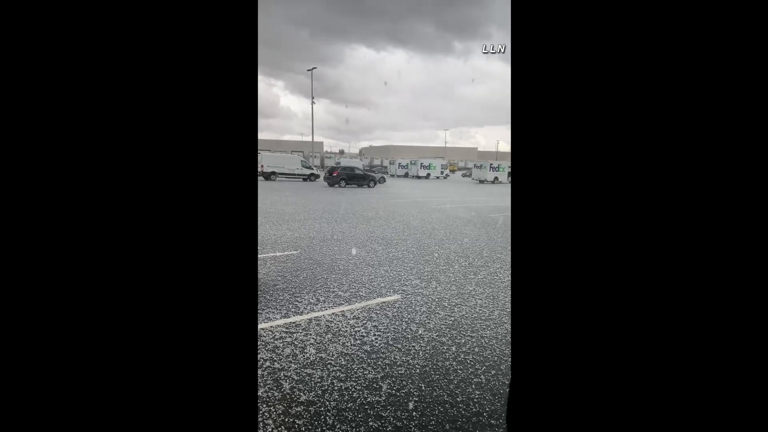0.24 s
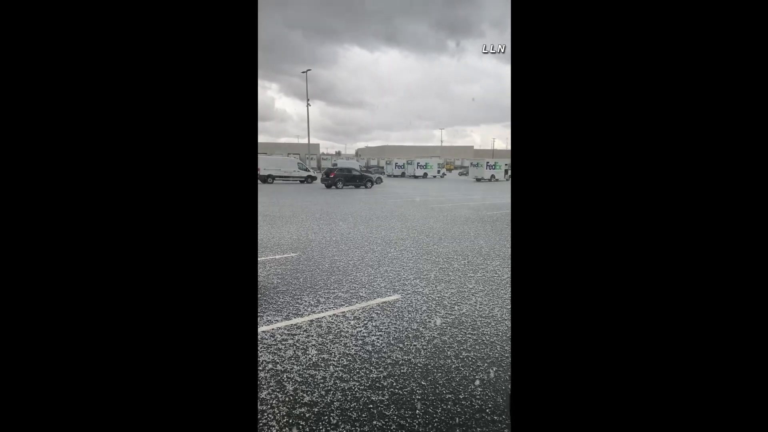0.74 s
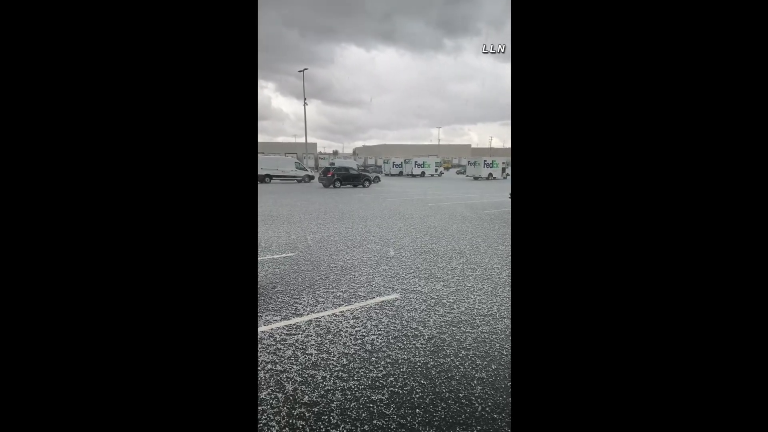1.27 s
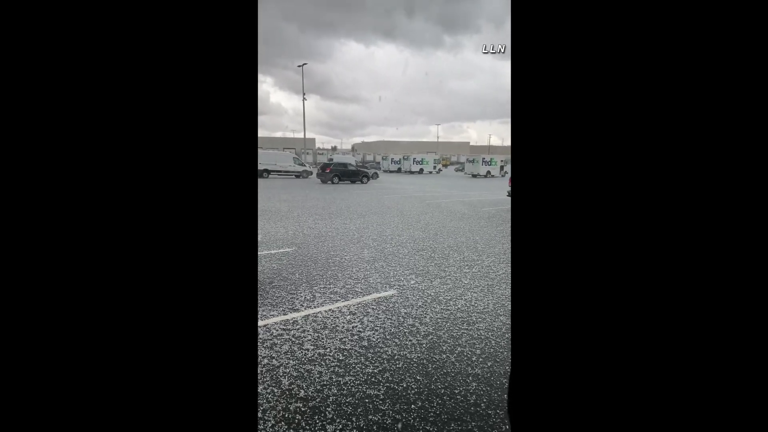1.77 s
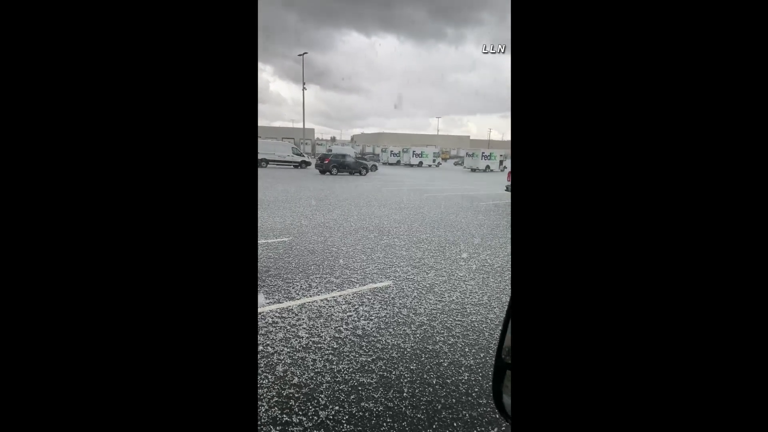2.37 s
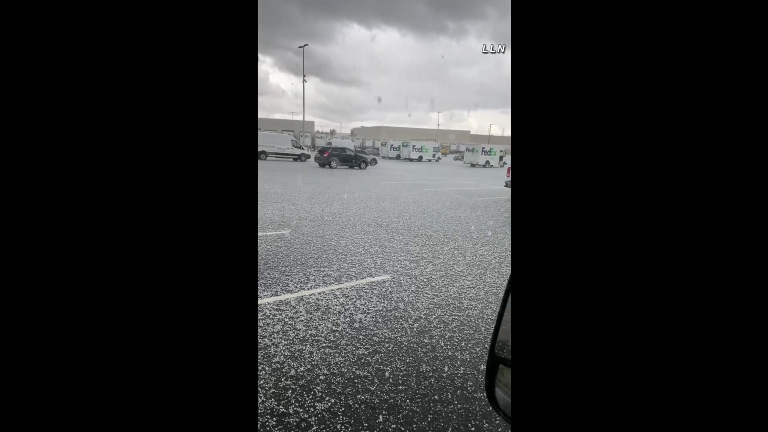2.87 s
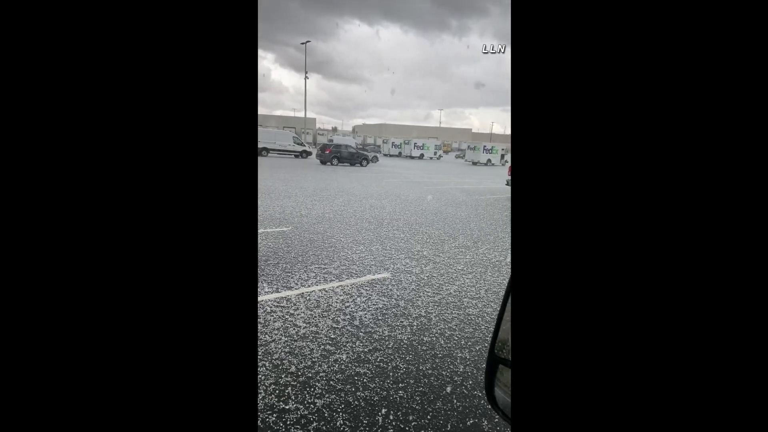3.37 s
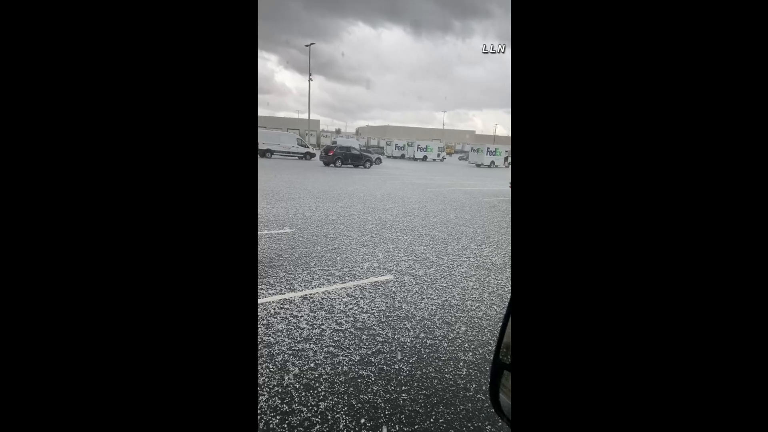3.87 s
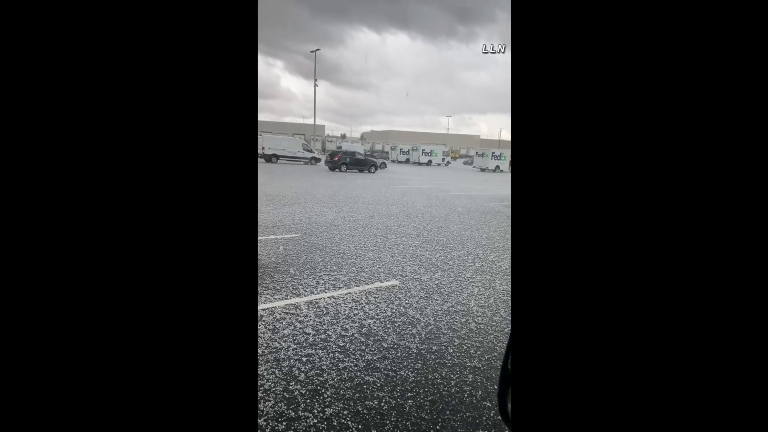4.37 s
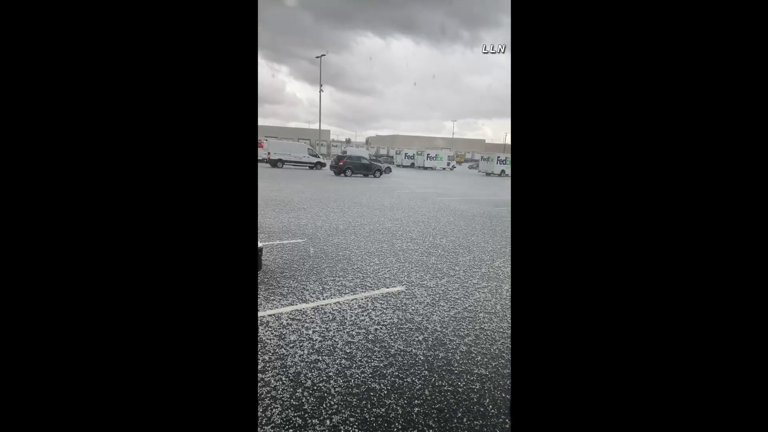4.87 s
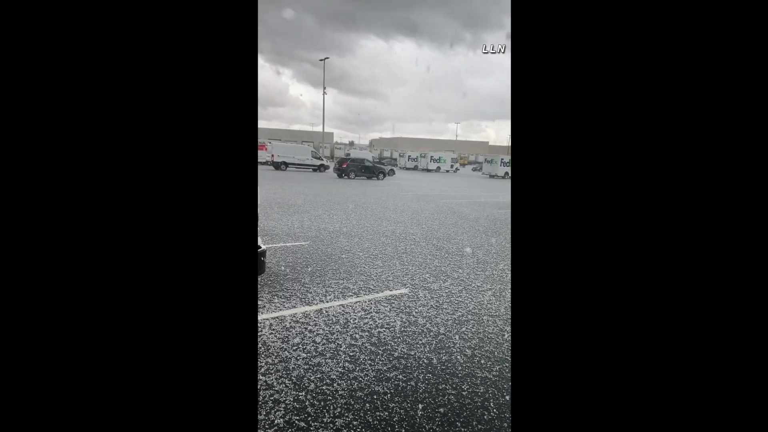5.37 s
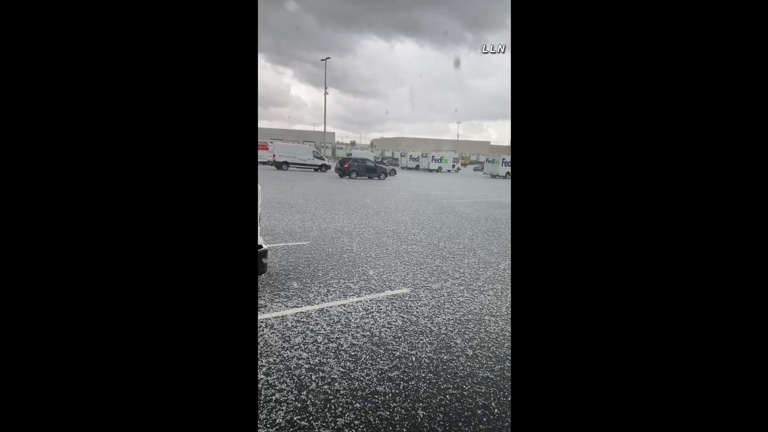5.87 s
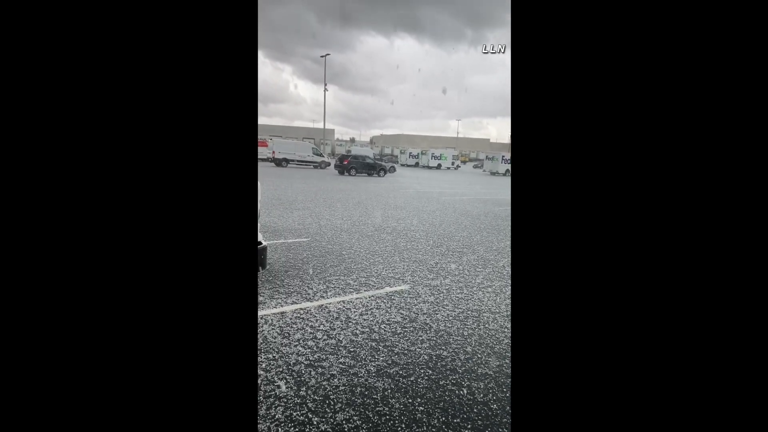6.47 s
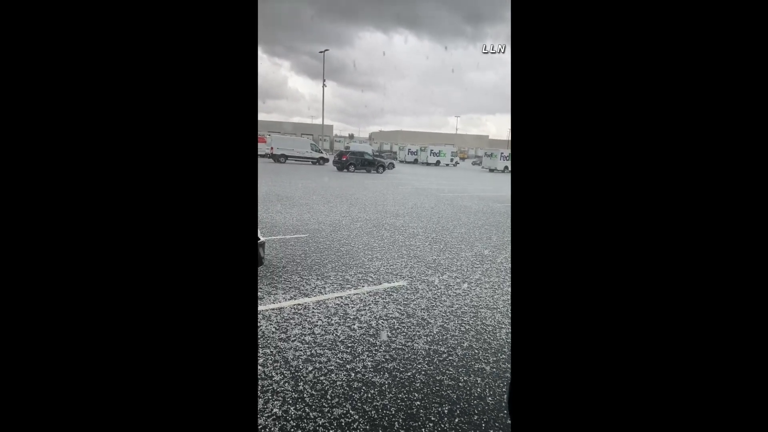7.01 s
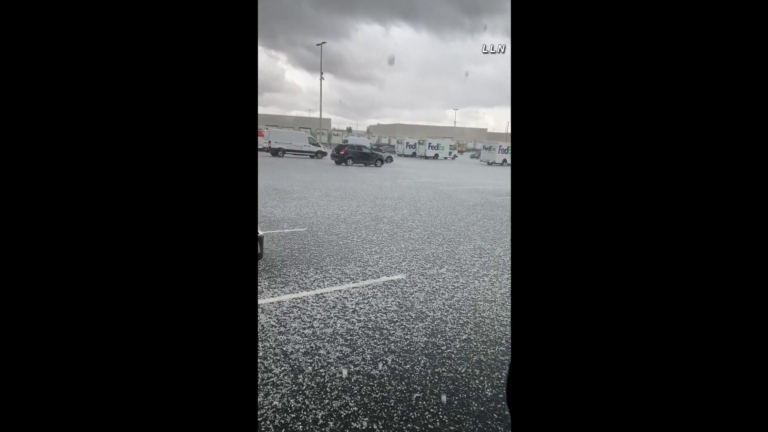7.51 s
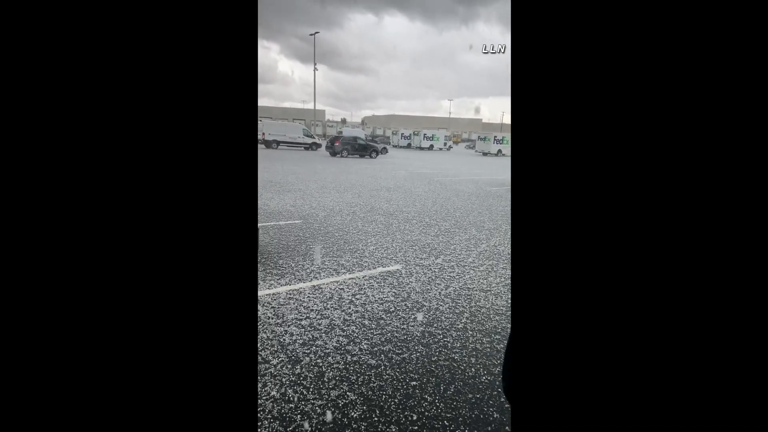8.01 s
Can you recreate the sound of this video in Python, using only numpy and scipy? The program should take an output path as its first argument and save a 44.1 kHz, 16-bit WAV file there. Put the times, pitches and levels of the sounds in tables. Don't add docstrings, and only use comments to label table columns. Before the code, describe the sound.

A steady, crackling clatter of hailstones on pavement and car metal, low cabin booms underneath, heaviest around five to six seconds, then slightly easing.

```python
import sys
import numpy as np
from scipy import signal
from scipy.fft import rfft, irfft, next_fast_len
from scipy.io import wavfile
from scipy.ndimage import uniform_filter1d, map_coordinates

SR = 44100
rng = np.random.default_rng(int(sys.argv[2]) if len(sys.argv) > 2 else 0)


def waveform_to_disk(signal):
    frames = np.transpose(np.atleast_2d(signal))
    scaled = np.clip(frames, -1, 1) * 32767
    samples = np.round(scaled).astype(np.int16)
    wavfile.write(sys.argv[1], SR, samples)


def gain_from_decibels(decibels):
    exponent = np.asarray(decibels, float) / 20
    return 10 ** exponent


N = 363825

# (time [s], level [dB])
FALL = [(0, -31), (.45, -29), (1.1, -28.5), (1.6, -28), (2.0, -27.5), (2.5, -26.5), (2.85, -28),
        (3.5, -24.5), (3.95, -27.5), (4.3, -27), (4.7, -26), (5.0, -25), (5.5, -24.5), (6.2, -24.5),
        (6.8, -24.5), (7.1, -25), (7.7, -27.5), (8.25, -27)]
# (time [s], level over the steady fall [dB], length [s])
GUSTS = [(0.073, 6, 0.028), (0.2, 5, 0.079), (0.81, 1.5, 0.023), (1, 4, 0.024), (1.067, -5, 0.026),
         (1.195, 3.5, 0.079), (1.337, -2, 0.018), (1.607, 3, 0.19), (1.7, -7, 0.013), (1.79, 5, 0.056),
         (1.933, -3, 0.095), (2.507, 2.5, 0.034), (2.706, 4, 0.029), (2.787, -1, 0.032),
         (2.954, 3.5, 0.062), (2.993, -6, 0.03), (3.028, 6.5, 0.045), (3.683, 2.5, 0.018),
         (4.033, 5, 0.015), (4.26, 2, 0.034), (4.368, -6.5, 0.022), (4.383, 3.5, 0.034),
         (4.983, 6.5, 0.022), (5.15, -5.5, 0.014), (5.187, 2.5, 0.013), (5.474, -4, 0.013),
         (5.495, 5, 0.017), (5.673, -2, 0.013), (7.424, -1.5, 0.063), (8.01, 5, 0.024)]
# (time [s], level over the steady fall [dB], length [s])
SHEETS = [(0.057, 1.5, 0.034), (0.167, 1.5, 0.017), (0.229, -1.5, 0.023), (0.476, -1.5, 0.022),
          (0.783, 0.5, 0.025), (0.883, -0.7, 0.05), (1.005, 3, 0.025), (1.048, -3.5, 0.019),
          (1.085, -0.5, 0.023), (1.125, -0.3, 0.021), (1.372, -1.5, 0.027), (1.559, 1.8, 0.025),
          (1.616, 1, 0.05), (1.771, -1.5, 0.16), (1.995, 0.7, 0.041), (2.038, 1, 0.025), (2.39, 2, 0.025),
          (2.432, -1.8, 0.03), (2.562, 1, 0.023), (2.637, -1, 0.021), (2.694, 1.5, 0.019),
          (2.744, -2.5, 0.017), (2.873, 0.9, 0.055), (3.108, -2, 0.017), (3.208, -1.5, 0.026),
          (3.455, -2, 0.02), (3.597, -1, 0.02), (3.662, 1.5, 0.011), (3.719, -2, 0.028), (3.791, 2, 0.024),
          (3.844, 0.5, 0.035), (3.894, -0.3, 0.025), (3.939, 2, 0.015), (4.018, 1, 0.027),
          (4.088, 3, 0.023), (4.146, -1.5, 0.019), (4.283, -2, 0.049), (4.325, 0, 0.025), (4.36, -4, 0.017),
          (4.395, 1.5, 0.025), (4.467, -0.5, 0.027), (4.535, 0.4, 0.05), (4.804, 2.5, 0.018),
          (5.076, 0.9, 0.12), (5.223, 1, 0.021), (5.348, 0.8, 0.014), (5.772, -0.6, 0.057),
          (5.817, 1.5, 0.033), (6.156, -1.5, 0.017), (6.323, 2, 0.025), (6.388, 1, 0.025),
          (6.622, 2, 0.017), (6.702, 0.4, 0.017), (6.834, 1.9, 0.04), (6.964, 2.5, 0.022),
          (7.236, -3, 0.027), (7.478, 1.7, 0.037), (7.568, 5, 0.016), (7.999, 2.5, 0.028),
          (8.141, -0.4, 0.025)]
# (frequency [Hz], width [Hz], left level [dB], right level [dB])
CABIN = [(52.7, 39, -11, -10.5), (82, 74, -14, -14), (148.7, 72, -5, -5), (270.7, 29, -7, -4),
         (321, 35, -5, -6), (385, 71, -5.5, -3.5), (480, 85, -12.5, -13), (646, 74, -4.5, -0.4),
         (818, 8.6, 3.5, -2), (945, 540, -2, -6), (1230, 42, -20, -6.5), (1390, 100, -5, -5)]
# (time [s], level [dB], ring [Hz])
BOOMS = [(0.132, -30, 137), (0.459, -33, 143), (0.791, -23, 146), (1.004, -28, 181), (1.121, -28, 135),
         (1.274, -28, 178), (1.597, -40, 150), (1.764, -35, 203), (2.255, -22.5, 133), (2.464, -36, 130),
         (2.567, -22, 161), (2.831, -28, 132), (2.922, -26, 54), (3.051, -24.5, 151), (3.926, -23, 144),
         (4.231, -31, 178), (4.369, -29, 168), (4.578, -27, 127), (4.678, -19, 137), (4.892, -21, 153),
         (5.488, -21, 147), (5.701, -27, 144), (5.868, -28, 141), (6.19, -21, 143), (6.303, -24, 162),
         (6.726, -22, 121), (7.061, -19, 136), (7.443, -30, 147), (7.557, -28.5, 130), (7.853, -30, 164)]
# (time [s], peak [dB], ring [Hz])
THUDS = [(0.07, -21, 330), (0.502, -21.5, 614), (0.63, -22, 318), (0.98, -17, 329), (1.197, -25, 387),
         (1.377, -18, 405), (1.55, -21, 318), (1.617, -15, 350), (1.711, -19, 403), (1.77, -17, 410),
         (2.108, -15, 297), (2.351, -14.5, 375), (2.454, -23, 676), (2.565, -21, 370), (2.852, -16, 402),
         (2.941, -14.5, 342), (3.007, -18, 237), (3.247, -17, 350), (3.393, -14, 359), (3.537, -21, 330),
         (3.631, -21, 344), (3.682, -13, 706), (4.0, -20, 660), (4.243, -14, 347), (4.385, -12, 288),
         (4.472, -13, 271), (4.83, -16, 680), (4.9, -16, 603), (4.981, -17.5, 393), (5.065, -8, 400),
         (5.178, -13, 336), (5.244, -18, 323), (5.566, -15, 290), (5.661, -9, 364), (5.809, -20, 293),
         (6.088, -17, 400), (6.121, -15, 600), (6.352, -9, 270), (6.434, -15, 318), (6.5, -15, 253),
         (6.613, -15, 430), (6.753, -19, 316), (6.927, -24, 248), (7.039, -16, 257), (7.14, -16, 395),
         (7.326, -18, 270), (7.566, -19, 340), (7.634, -17, 404), (7.792, -15.5, 395), (8.117, -16, 320)]
# (time [s], peak [dB], ring [Hz])
CRACKS = [(0.1595, -17, 3940), (0.1845, -20.5, 3590), (0.3336, -19.5, 4160), (0.4733, -18, 3800),
          (0.7751, -26.5, 3950), (1.0819, -18, 3730), (1.2595, -26, 4340), (1.278, -15, 3960),
          (1.3114, -15.5, 3890), (1.4875, -19, 3600), (1.5514, -20, 3800), (1.6137, -18, 3570),
          (1.8432, -21, 3750), (1.9011, -20, 4040), (1.928, -20, 3740), (1.9739, -19, 3500),
          (2.0707, -16, 3780), (2.1121, -17, 3860), (2.1635, -18, 3470), (2.1974, -23, 4300),
          (2.2253, -21, 3600), (2.4882, -27, 3900), (2.6873, -17.5, 3880), (3.1916, -17, 4760),
          (3.2076, -20, 4000), (3.3667, -24, 3550), (3.5798, -31, 3760), (3.596, -9.5, 4360),
          (3.7604, -15.5, 3830), (3.933, -21.5, 3460), (4.0203, -16, 3250), (4.0791, -10.5, 4530),
          (4.3141, -26, 3260), (4.3291, -21, 4260), (4.3819, -22, 3800), (4.4343, -25, 3870),
          (4.5411, -20, 4010), (4.7326, -27, 3950), (4.7471, -17, 3740), (4.803, -22, 3320),
          (4.8808, -21, 3700), (4.9048, -16, 3680), (5.0075, -18, 3850), (5.1327, -18, 4590),
          (5.2794, -27, 3730), (5.3193, -20.5, 4130), (5.5004, -20, 3250), (5.9868, -17, 3230),
          (6.0975, -18, 4050), (6.1115, -21, 3360), (6.1943, -25, 4250), (6.3051, -25, 4220),
          (6.4817, -19.5, 3900), (6.7925, -31, 4400), (6.8089, -29, 3560), (6.8728, -15, 3450),
          (7.3228, -27, 3320), (7.3572, -14, 4150), (7.4819, -20, 4300), (8.1703, -18, 4200)]
# (time [s], peak [dB], ring [Hz])
KNOCKS = [(0.4467, -27, 3150), (0.6284, -19.5, 2560), (1.012, -25.5, 2880), (1.5753, -16, 2820),
          (2.0712, -22, 3080), (2.1016, -24, 3070), (2.1963, -23, 2950), (2.2752, -19, 2760),
          (2.5639, -19, 2950), (2.9367, -27, 2490), (3.013, -25, 2860), (3.1908, -16, 2400),
          (3.202, -16, 2930), (3.3662, -28, 3150), (3.692, -18, 2570), (3.761, -16, 2600),
          (3.852, -29, 2740), (3.9382, -22, 2850), (3.9948, -39, 2710), (4.012, -20, 2560),
          (4.0241, -19, 2590), (4.1012, -16, 2960), (4.3282, -21.5, 2460), (4.577, -15.5, 2620),
          (4.7098, -21, 2700), (4.7336, -23, 2400), (4.7512, -17, 2710), (4.804, -26, 2670),
          (4.8626, -22.5, 2950), (4.9376, -25, 3010), (4.977, -30, 2930), (5, -25, 2590),
          (5.0769, -23.5, 2830), (5.2822, -20.5, 2790), (5.3215, -23, 2710), (5.3774, -25, 2830),
          (5.507, -19, 2510), (5.5762, -23, 2640), (5.7465, -25, 3100), (5.8195, -19, 2800),
          (5.875, -22, 2250), (5.9346, -22, 3000), (5.967, -17, 2600), (6.098, -28, 3040),
          (6.1774, -27, 2640), (6.1947, -20, 2650), (6.235, -21, 2610), (6.2756, -33, 3000),
          (6.574, -23, 2450), (6.6197, -22, 2590), (6.6662, -25, 3250), (6.7359, -23, 3040),
          (6.792, -25, 2810), (6.811, -20, 2960), (7.0566, -16, 2480), (7.0963, -24, 2570),
          (7.48, -38, 2900), (7.6221, -22, 2470), (7.7972, -18.5, 2710), (8.1718, -25.5, 2520)]
# (time [s], level [dB], pitch [Hz])
TAPS = [(0.189, -37, 2530.0), (0.289, -34, 3220), (0.338, -32, 2730.0), (0.401, -31, 2780),
        (0.571, -31, 4580.0), (0.643, -29.5, 3240.0), (0.646, -32, 5100), (0.705, -29, 3510.0),
        (0.712, -29, 2450), (0.899, -34, 2910.0), (0.987, -32, 3010.0), (1.08, -33, 4430.0),
        (1.167, -33, 2580.0), (1.202, -34, 2500), (1.482, -33, 3100), (1.582, -29, 3820),
        (1.623, -30, 5150), (1.629, -29, 2950), (2.099, -29, 2550), (2.339, -30, 4240.0),
        (2.353, -28, 4570.0), (2.46, -30, 3060), (2.573, -26, 4000), (2.702, -28, 2420),
        (2.718, -27, 2920.0), (2.766, -32, 4770.0), (3.153, -35, 2980), (3.205, -26, 4520.0),
        (3.214, -30.5, 2430.0), (3.317, -29, 2870.0), (3.692, -32, 3030.0), (3.762, -26, 2750),
        (3.8, -35, 2880), (3.931, -27.5, 4970), (4.032, -31, 2860), (4.343, -25, 2780),
        (4.521, -27.5, 2810.0), (4.541, -38, 3110.0), (4.613, -32, 4110.0), (5.344, -28, 5330),
        (5.387, -25, 3080), (5.415, -29, 3130), (5.6, -24, 2710.0), (5.612, -36, 3430),
        (5.816, -24, 4660.0), (6.108, -27, 3130), (6.194, -28, 2970.0), (6.426, -24, 5000),
        (6.435, -35.5, 3430), (6.539, -27, 3930), (6.64, -27, 2850.0), (6.836, -34, 2950),
        (6.898, -28, 2930.0), (6.958, -27, 4740), (7.049, -30, 2960.0), (7.48, -26.5, 4240),
        (7.572, -36, 2500), (7.911, -31.5, 3990.0), (8.015, -28, 2860.0), (8.026, -27, 4400)]
# (time [s], level [dB])
FACING = [
    (0, -1.5),
    (2.0, -3),
    (2.4, 2),
    (4.2, 1.5),
    (4.6, 0),
    (8.25, 1.5),
]
# (frequency [Hz], width [Hz], level [dB])
GLASS = [
    (2710, 63, -1),
    (2850, 67, -12),
    (5200, 1900, 3.5),
]
# (frequency [Hz], level per Hz [dB])
LOT = [(700, -40), (1400, -10.0), (1800, -11.9), (2600, -7.1), (3100, -8.2), (3900, -10.7), (4900, -11.4),
       (5600, -12.8), (7000, -15), (9000, -20.1), (10500, -24.9), (12900, -22.8), (14500, -27.8),
       (15700, -33.3)]
# (frequency [Hz], likeness [0-1])
ALIKE = [(200, 1), (420, .975), (560, .3), (750, .24), (1050, .45), (1380, .68), (1850, .14), (2800, .68),
         (3600, .25), (4900, .63), (5400, .58), (6300, .82), (12800, .88), (15500, .62)]
# (frequency [Hz], lead [rad])
LEAD = [(40, -.02), (300, -.12), (520, -.6), (680, .4), (1030, 3.2), (1290, 2.9), (1750, 1.9), (2200, 2.7),
        (3960, 1.5), (4900, 2.5), (5800, 1.8), (8200, 2.7), (11800, 3.6), (15100, 5.1)]
# (frequency [Hz], left minus right [dB])
LEAN = [
    (1500, -0.5),
    (2700, 0),
    (4200, -1.2),
    (6400, 0),
]
# (from [Hz], to [Hz], share of frames kept [0-1], level [dB])
GAP_EDGES = [
    (7580, 7950, 1, .5),
    (7950, 8269, .97, 1),
    (8269, 8500, .3, 1.5),
    (8500, 8960, .05, 0),
    (11025, 11370, .2, 2),
    (11370, 11714, .5, 1.5),
    (11714, 12403, .97, .7),
]

BOOM_DB, DRUM_DB, CLATTER_DB = -4.5, -7.5, -5.5
BOOM_GROWS, DRUM_GROWS, CLATTER_GROWS = 1.0, 0.99, 1.12
DRUM_GUST, SHEET_DEPTH = .6, 1.15
EDDY_DB, EDDIES_PER_S = .8, 20
BOOM_RING_DB, BOOM_T60_S, BOOM_RISE_S = 4.5, 0.16, 0.018
THUD_DB, THUD_T60_S, THUD_RISE_S = -5, 0.087, 0.0036
CRACK_DB, KNOCK_DB = 3.5, 2.5
SNAP_T60_S, AFTER_T60_S, AFTER_DB = .0035, .05, -20
KNOCK_AFTER_DB = 7
CRACK_RATTLE_DB, KNOCK_RATTLE_DB, RATTLE_GROWS, MIDDLING_DB = -4, -4.5, 0.62, -16
CHIPS_TOP_HZ, CHIPS_RISE_S, CHIPS_T60_S = 11000, .003, .04
CHIPS_Q, TUNED_DB, BROAD_DB = (2.5, 6), -8.5, -5
SHARD_S, SHARD_DB, SHARD_SPREAD = .015, -5, .22
TAP_DB, TAP_Q, TAP_RISE_S, TAP_T60_S = -1, 5, .005, .085
DOOR_HZ, DOOR_WIDTH_HZ = 2510, 920
DOOR_RING_HZ, DOOR_T60_S, DOOR_DB = 2656, 0.086, -20
FLICKER_DB = 1.15
PORT_LAG_S = .00007
MID_GAP_HZ, TOP_HZ = (8960, 11025), 15770
SIDE_FROM_HZ, SIDE_LIFT_DB = 70, 1


def roof(boom_db, drum_db):
    def cabin(f):
        power = 0
        for centre, width, left_db, right_db in CABIN:
            peak = (f * width) ** 2 / ((centre * centre - f * f) ** 2 + (f * width) ** 2)
            power = power + gain_from_decibels([[left_db], [right_db]]) ** 2 * peak
        return np.sqrt(power / (1 + (f / 2000) ** 4) / (1 + (45 / (f + 1)) ** 4))
    whole = ports(blows(share=.03, spread_db=5.5, blur=1.33), cabin)
    boom = filtered(whole, lambda f: 1 / (1 + (f / 520) ** 6))
    metal = whole - boom
    return gain_from_decibels(boom_db + 0.34) * unit(boom) + gain_from_decibels(drum_db + 4.0) * unit(metal)


def booms():
    s, db, hz = np.transpose(BOOMS)
    return rings(s, gain_from_decibels(db + BOOM_RING_DB), hz, BOOM_T60_S, rise=BOOM_RISE_S, size=SR // 5)[0]


def thuds():
    s, db, hz = np.transpose(THUDS)
    return rings(s, gain_from_decibels(db + THUD_DB), hz, THUD_T60_S, rise=THUD_RISE_S, size=SR // 10)[0]


def stones():
    s, db, hz, rattle_db = near_stones()
    knock = (np.arange(len(s)) >= len(CRACKS)).astype(int)
    snap = rings(s, gain_from_decibels(db + 8), hz, SNAP_T60_S, rise=.0009)[0]
    after_db = db + 5.5 + AFTER_DB + KNOCK_AFTER_DB * knock
    after = rings(s, gain_from_decibels(after_db), hz, AFTER_T60_S, rise=.002, size=SR // 25)[0]
    cracks = snap + shards(s, db, hz) + after
    for ratio in (.75, 1.3, 1.6):
        cracks = cracks + rings(s, gain_from_decibels(db + 5 - 4 * knock), ratio * hz, .003, rise=.0009)[0]

    def ice(f):
        hump = f * 3000 / np.abs(3500 ** 2 - f * f + 1j * f * 3000)
        return gain_from_decibels(20.0) * hump / np.sqrt(1 + (f / CHIPS_TOP_HZ) ** 4)

    def lag(f):
        shift = np.exp(1j * np.pi * f * PORT_LAG_S * np.array([[1], [-1]]))
        return shift / np.sqrt(1 + (900 / (f + 1)) ** 4)
    return filtered(cracks, lag) + ports(chips(s, rattle_db, hz, knock), ice)


def near_stones():
    s, db, hz = np.vstack([CRACKS, KNOCKS]).T
    counts = [len(CRACKS), len(KNOCKS)]
    db = db + np.repeat([CRACK_DB, KNOCK_DB], counts)
    rattle_db = np.repeat([CRACK_RATTLE_DB, KNOCK_RATTLE_DB], counts)
    fall = np.interp(s, *np.transpose(FALL))
    return s, db, hz, fall + rattle_db + RATTLE_GROWS * (db - MIDDLING_DB)


def shards(s, db, hz, count=5):
    late, luck = rng.random((len(s), count)), rng.standard_normal((len(s), count, 2))
    level = db[:, None] + SHARD_DB - 6 * late + 2.5 * luck[..., 0]
    pitch = hz[:, None] * np.exp(.1 + SHARD_SPREAD * luck[..., 1])
    times = np.abs(s[:, None] + SHARD_S * (late - .15)).ravel()
    gains = gain_from_decibels(level + 6.5).ravel()
    return rings(times, gains, pitch.ravel(), SNAP_T60_S, rise=.0008, size=SR // 200)[0]


def chips(s, rattle_db, hz, knock):
    out, t = np.zeros((2, N + SR)), np.arange(SR // 10) / SR
    for start, level_db, pitch, kind in zip(s, rattle_db, hz, knock):
        fade = gain_from_decibels(level_db - 60 * t / CHIPS_T60_S) * (1 - np.exp(-t / CHIPS_RISE_S))
        spray = rng.standard_normal((2, 2, len(t)))
        tuned = unit(signal.lfilter(*signal.iirpeak(pitch, CHIPS_Q[kind], SR), spray[0]))
        rattle = gain_from_decibels(TUNED_DB) * tuned + gain_from_decibels(BROAD_DB) * spray[1]
        out[:, round(start * SR):][:, :len(t)] += fade * rattle
    return out[:, :N]


def taps():
    out, t = np.zeros((2, N + SR)), np.arange(SR // 12) / SR
    fade = gain_from_decibels(TAP_DB - 60 * t / TAP_T60_S) * (1 - np.exp(-t / TAP_RISE_S))
    for s, db, hz in TAPS:
        rough = rng.standard_normal((2, len(t)))
        for stage in range(2):
            rough = signal.lfilter(*signal.iirpeak(hz, TAP_Q, SR), rough)
        out[:, round(s * SR):][:, :len(t)] += gain_from_decibels(db) * 2 * fade * unit(rough)
    return out[:, :N]


def door(near_db, count=160):
    chance, luck = rng.random((count, 2)), rng.standard_normal((count, 2))
    hz = DOOR_RING_HZ * (1 + .035 * luck[:, 1])
    notes = rings(chance[:, 0] * N / SR, gain_from_decibels(3 * luck[:, 0]), hz, DOOR_T60_S, chance[:, 1] < .3)
    return gain_from_decibels(near_db + DOOR_DB) * unit(notes)


def turned(x):
    gain = gain_from_decibels(np.interp(np.arange(N) / SR, *np.transpose(FACING)))
    return x + (gain - 1) * filtered(x, lambda f: np.exp(-((f - DOOR_HZ) / DOOR_WIDTH_HZ * 2) ** 2))


def pavement(near_db, count=6000):
    def far_colour(hz):
        return gain_from_decibels(along(LOT, hz)) * np.sqrt((1 + (hz / 6500) ** 2) / (1 + (hz / 12000) ** 2))

    def near_colour(f):
        panels = sum(gain_from_decibels(db) * 1j * f * w / (c * c - f * f + 1j * f * w) for c, w, db in GLASS)
        return gain_from_decibels(along(LOT, f)) / np.sqrt(1 + (f / 7000) ** 2) * (1 + .9 * panels)
    far_db = near_db + FLICKER_DB * (wobble(22) + .5 * wobble(50))
    far = unit(filtered(rng.standard_normal((2, N)), far_colour))
    patter = unit(filtered(blows(share=.06, spread_db=4.3, blur=0.45), near_colour))
    chance = rng.random((count, 4))
    hz = 3200 * np.exp(0.23 * rng.standard_normal(count))
    size = gain_from_decibels(-13 * chance[:, 1] ** .45)
    t60 = (14 + 80 * chance[:, 2] ** 2) / hz
    ticks = unit(rings(chance[:, 0] * N / SR, size, hz, t60, chance[:, 3] < .4))
    flurries = gain_from_decibels(np.array([.5 * wobble(16) + 1.2 * wobble(45) for _ in range(2)]))
    near = flurries * (patter + gain_from_decibels(-2.5) * ticks)
    return gain_from_decibels(far_db + 1.2) * far + gain_from_decibels(near_db - 1.2) * near


def levels():
    fall = np.interp(np.arange(N) / SR, *np.transpose(FALL))
    mean, gust = fall.mean(), swells(GUSTS)

    def layer(db, grows, swell, eddy):
        return mean + db + grows * (fall - mean) + swell + eddy * EDDY_DB * wobble(EDDIES_PER_S)
    return (layer(BOOM_DB, BOOM_GROWS, gust, 1),
            layer(DRUM_DB, DRUM_GROWS, DRUM_GUST * gust, 1),
            layer(CLATTER_DB, CLATTER_GROWS, SHEET_DEPTH * swells(SHEETS), .5))


def swells(rows):
    t, total = np.arange(N) / SR, np.zeros(N)
    for s, db, length in rows:
        span = slice(max(int((s - .25) * SR), 0), int((s + .25) * SR))
        total[span] += db * np.exp(-((t[span] - s) / length) ** 2)
    return total


def wobble(rate):
    knots = rng.standard_normal(int(N * rate / SR) + 4)
    return map_coordinates(knots, [np.arange(N) * rate / SR], order=1)


def blows(share, spread_db, blur):
    hit = rng.random((2, N)) < share
    size = gain_from_decibels(spread_db * rng.standard_normal((2, N))) * rng.choice([-1, 1], (2, N))
    return unit(unit(hit * size) + blur * rng.standard_normal((2, N)))


def rings(times, gains, hz, t60, streams=0, rise=.0006, size=SR // 50):
    t = np.arange(size) / SR
    t60 = t60 * np.ones(len(times))
    streams = streams + np.zeros(len(times), int)
    envelope = gain_from_decibels(-60 * t / t60[:, None]) * (1 - np.exp(-t / rise))
    rows = gains[:, None] * np.sin(2 * np.pi * hz[:, None] * t) * envelope
    where = (times * SR).astype(int)[:, None] + np.arange(size) + streams[:, None] * (N + SR)
    return np.bincount(where.ravel(), rows.ravel(), 2 * (N + SR)).reshape(2, -1)[:, :N]


def ports(pair, colour):
    size = 2 * next_fast_len(N // 2 + 4096)
    hz = np.fft.rfftfreq(size, 1 / SR)
    turn = np.arccos(np.clip(along(ALIKE, hz), 0, 1)) / 2
    sign = np.array([[1], [-1]])
    shared, opposed = rfft(pair, size)
    heard = shared * np.cos(turn) + sign * opposed * np.sin(turn)
    return irfft(heard * np.exp(.5j * sign * along(LEAD, hz)) * colour(hz))[:, :N]


def filtered(x, response):
    m = next_fast_len(N + 8192)
    return irfft(rfft(x, m) * response(np.fft.rfftfreq(m, 1 / SR)), m)[..., :N]


def along(points, hz):
    f, v = np.transpose(points)
    return np.interp(np.log(hz + 1), np.log(f + 1), v)


def unit(x):
    return x / np.sqrt(np.mean(x ** 2) + 1e-20)


def scene():
    def lean(hz):
        return gain_from_decibels(np.array([[.5], [-.5]]) * along(LEAN, hz)) / np.sqrt(1 + (900 / (hz + 1)) ** 4)
    boom_db, drum_db, near_db = levels()
    vehicle = roof(boom_db, drum_db) + booms() + thuds()
    lot = turned(pavement(near_db) + door(near_db)) + taps()
    return vehicle + stones() + ports(lot, lean)


def band_limit(x):
    return signal.sosfilt(signal.butter(12, 16970, fs=SR, output="sos"), x)


def record(dry):
    pair = np.array([dry[0] + dry[1], dry[0] - dry[1]]) / 2
    pair = np.pad(pair, ((0, 0), (513, 0)))
    hz, t, z = signal.stft(pair, SR, nperseg=2048, noverlap=1024)
    z[0, (hz >= MID_GAP_HZ[0]) & (hz < MID_GAP_HZ[1])] = 0
    for start, end, kept, db in GAP_EDGES:
        band = (hz >= start) & (hz < end)
        power = np.log(np.sum(np.abs(z[0, band]) ** 2, 0) + 1e-20)
        swell = power - uniform_filter1d(power, size=25)
        z[0, band] *= gain_from_decibels(db) * (swell >= np.quantile(swell, 1 - kept))
    side_gain = gain_from_decibels(SIDE_LIFT_DB * (hz > 7580)) / np.sqrt(1 + (SIDE_FROM_HZ / (hz + 1)) ** 4)
    z[1] *= side_gain[:, None]
    step = np.round(.8 * rng.standard_normal((2, len(t))))
    top = TOP_HZ - np.array([[300], [400]]) * np.clip(step - [[1], [0]], 0, 3)
    z *= hz[:, None] < top[:, None]
    mid, side = signal.istft(z, SR, nperseg=2048, noverlap=1024)[1][:, 513:N + 513]
    return band_limit(np.array([mid + side, mid - side]))


dry = scene()
out = record(dry)
waveform_to_disk(out)
```